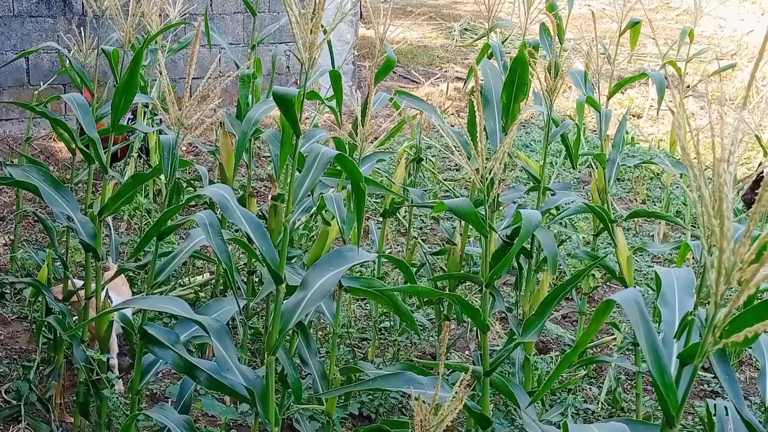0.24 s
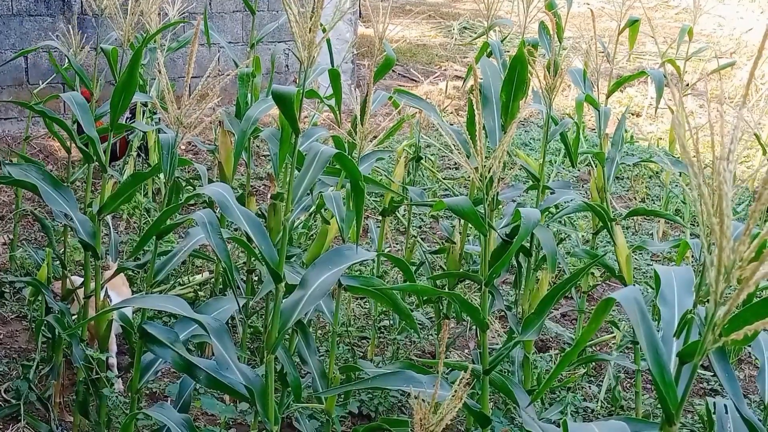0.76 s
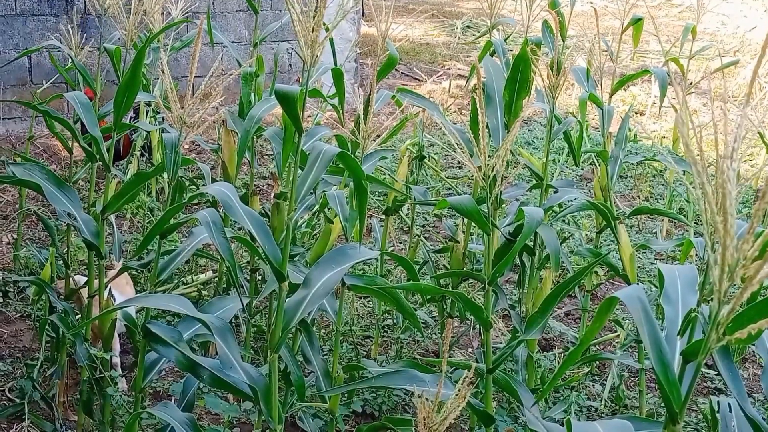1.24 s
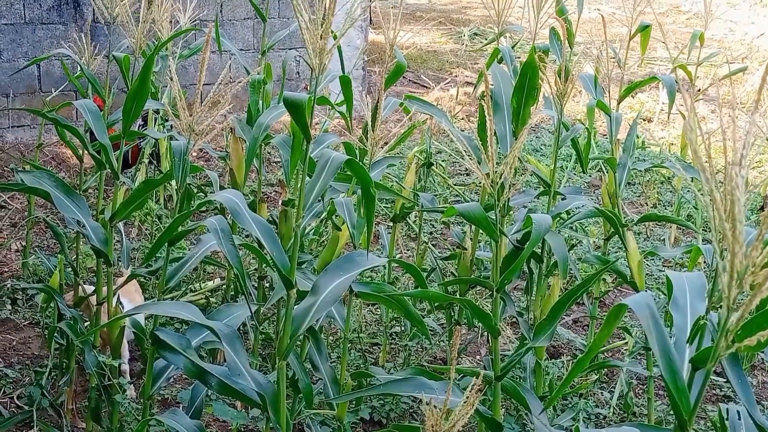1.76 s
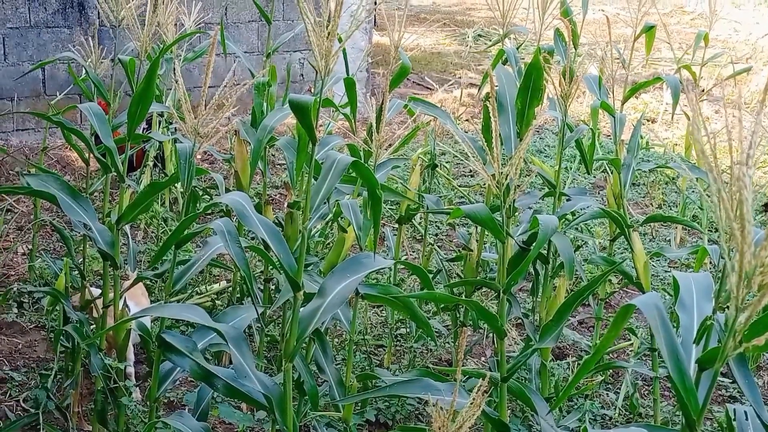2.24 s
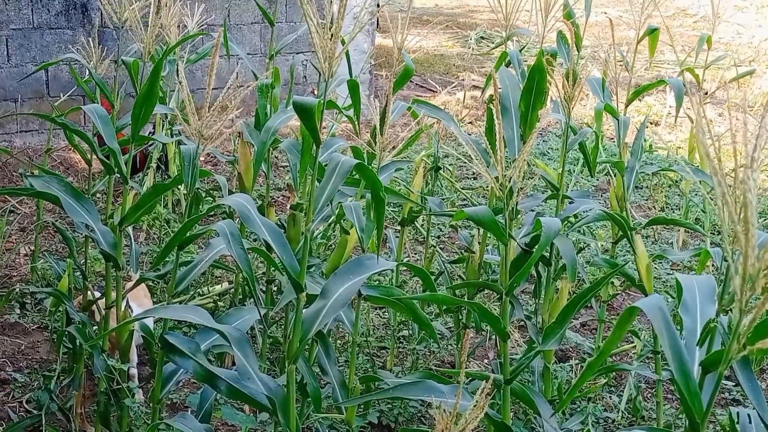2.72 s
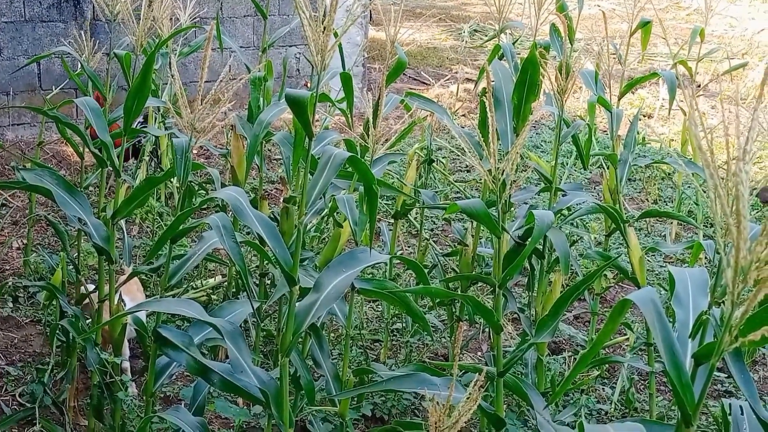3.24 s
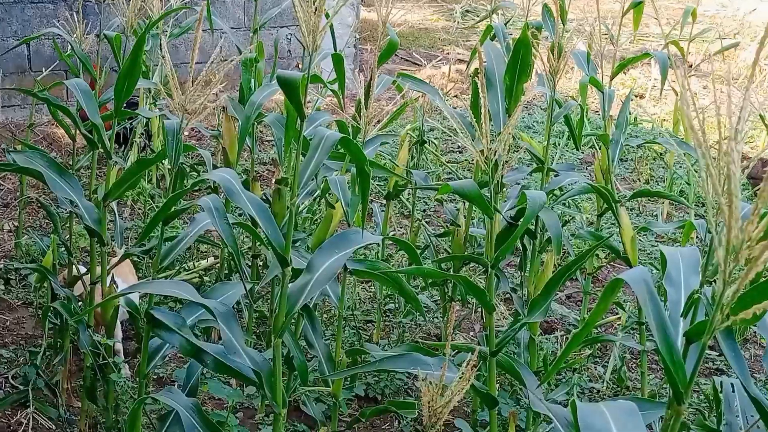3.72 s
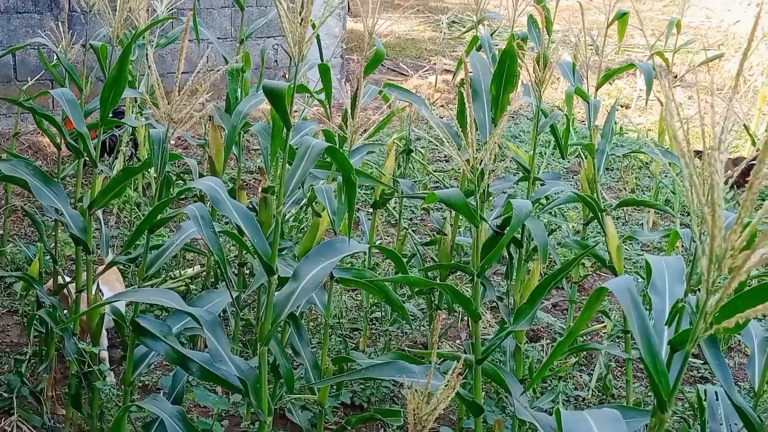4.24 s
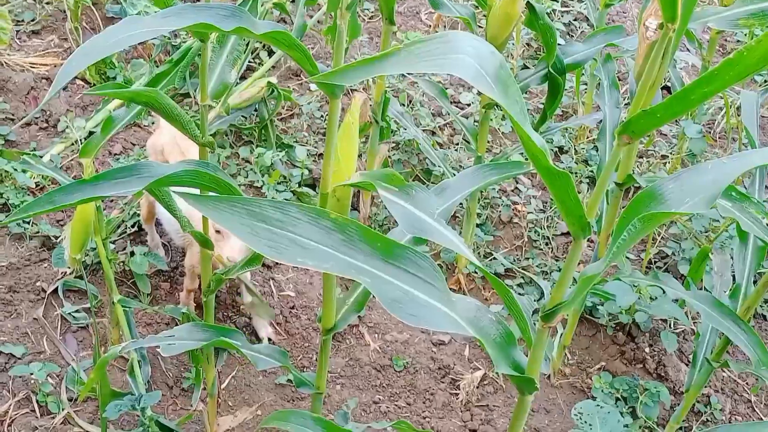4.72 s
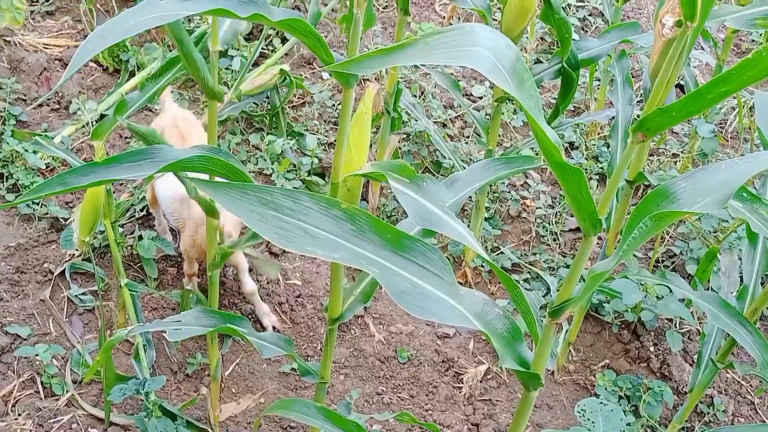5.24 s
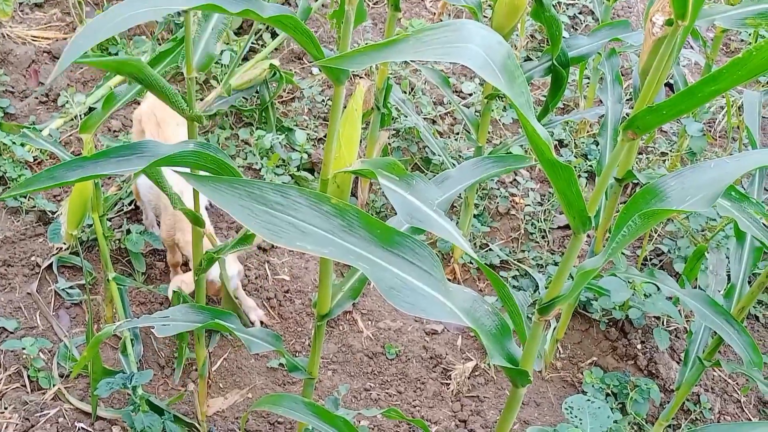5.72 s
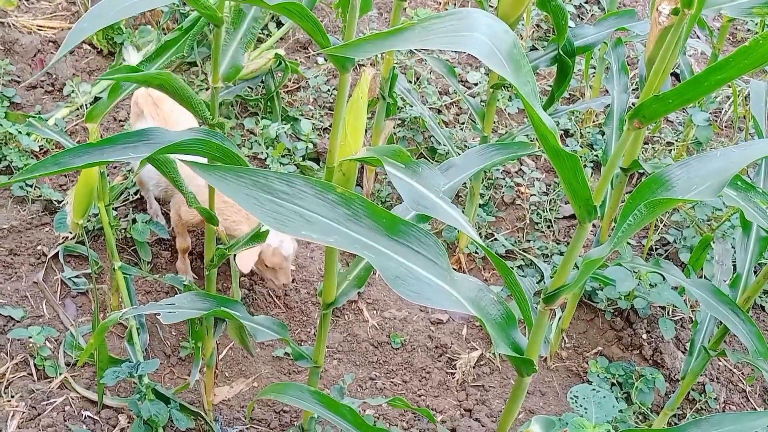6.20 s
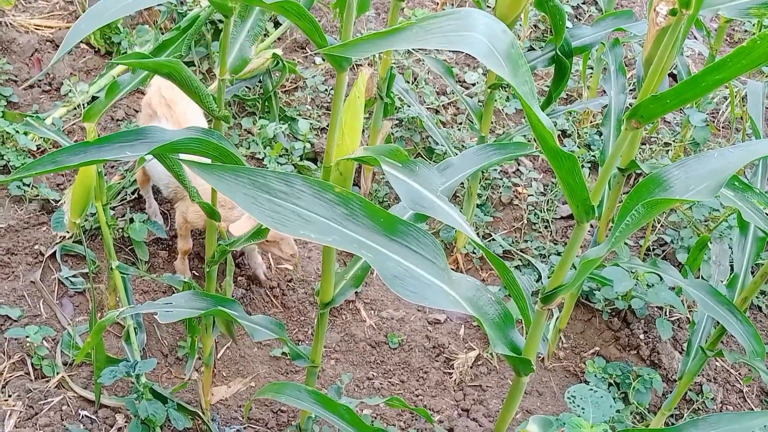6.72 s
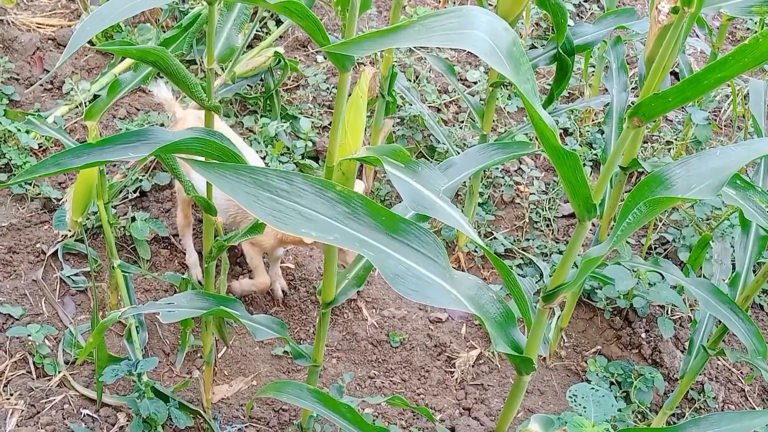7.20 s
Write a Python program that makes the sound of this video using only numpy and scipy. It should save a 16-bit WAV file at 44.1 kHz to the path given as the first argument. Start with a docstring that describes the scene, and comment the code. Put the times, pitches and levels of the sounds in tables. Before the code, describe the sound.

Small birds chirp throughout in an outdoor maize patch, over a faint bed of air and distant flock chatter. Far, echoing trills and a few falling chips open the first second, followed by short rising and slurred whistles. From about 1.9 to 3.9 seconds a close bird gives four high, falling peeps, roughly half a second apart, each followed by a quick dropping note. A very thin, faint twitter sits behind it between 2 and 3 seconds. Dull bumps and a low rumble reach the hand-held microphone from about 2 to 4.5 seconds. A brief, patchy hiss comes between 4 and 4.7 seconds, then distant trills and a short whistle fill the gap. The near bird returns softly at 5.8 seconds and peeps more strongly at about 6.3, 6.9 and 7.4 seconds, surrounded by diving whistles, trills and a quickening cluster of chips.

```python
"""A near bird repeats falling peeps, some followed by a quick tew, in a maize patch by a block wall.
Other small birds chip, dive, whistle and twitter all round; the farthest trill, smeared by echo.
Each voice is a syrinx: a nearly pure tone, bent in pitch and fluttering in level.
Dull bumps and a low rumble reach the hand-held microphone, and a brief, patchy treble hiss sits behind
the high calls, all over a faint bed of outdoor air and distant flock."""
import sys
import numpy as np
from scipy import signal
from scipy.fft import rfft, irfft
from scipy.io import wavfile
from scipy.ndimage import uniform_filter1d, minimum_filter1d, map_coordinates

SR = 44100
rng = np.random.default_rng(int(sys.argv[2]) if len(sys.argv) > 2 else 0)


def store_pcm(level_fs):
    """Save levels as 16-bit WAV."""
    pcm = np.round(np.clip(level_fs, -1, 1) * 32767).astype(np.int16)
    wavfile.write(sys.argv[1], SR, np.atleast_2d(pcm).T)


N = 328986
TIME = np.arange(N) / SR

# tone of the outdoor air: frequency_hz, density_db
AIR_COLOUR = [(25, -41), (70, -1.5), (150, 15.5), (300, -28), (700, 5.5), (4300, -5), (5500, -2),
              (8400, -12.5), (11600, -42), (15000, -35.5)]
# tone of the distant flock: frequency_hz, density_db
FLOCK_COLOUR = [(1000, -63), (1400, -6.5), (1800, 7), (3600, 10.5), (4200, 9.5), (4900, -34.5), (6000, -42)]
# fader ride on the flock: time_s, level_db
FLOCK_RIDE = [(0, -19.5), (.85, -26), (1.3, -34), (4.4, -30.5), (5.2, -23.5), (7.46, -36.5)]
# fader ride on the low buffeting: time_s, level_db
RUMBLE_RIDE = [(0, -39), (.7, -45), (1.55, -46.5), (1.8, -32.5), (2.7, -30.5), (3.1, -39), (4.4, -33.5),
               (4.7, -36.5)]
# tone of the buffeting and its small knocks: frequency_hz, density_db
RUMBLE_COLOUR = [(25, -47), (85, 2.5), (170, 0), (500, -11), (2000, -54.5)]
# the hardest bumps on the microphone: start_s, level_db
THUDS = [(1.952, -16), (2.072, -11.5), (2.106, -18.5), (2.538, -14), (2.625, -18), (3.561, -14.5),
         (3.644, -15), (3.937, -19), (4.008, -27), (4.225, -20), (4.376, -15.5), (4.423, -20)]
# far trills, plus the fuzzy ringing echo of one slurred whistle (at 1.338 s):
# start_s, length_s, first_pitch_hz, last_pitch_hz, fall_per_note_hz, level_db
TRILLS_AND_ECHO = [(0, 0.042, 1787, 1779, 432, -13.5), (.005, 0.043, 4450, 4790, 495, -22.5),
                   (.046, .22, 2906, 2762, 344, -12.5), (0.048, 0.41, 2304, 2274, 380, -11.5),
                   (1.338, 0.12, 3662, 3730, 250, -13), (2.717, 0.17, 2686, 2700, 420, -23),
                   (2.739, 0.24, 1964, 1933, 498, -22), (3.029, 0.2, 2120, 2040, 427, -22.5),
                   (3.104, .39, 1552, 1449, 57.3, -24), (4.514, 0.085, 4444, 3330, 460, -14.5),
                   (4.606, .18, 3500, 3010, 650, -10), (4.622, 0.15, 3960, 3860, 392, -18.5),
                   (4.791, 0.4, 3058, 2554, 774, -15.5), (4.793, 0.23, 1739, 1814, 275, -13),
                   (4.798, 0.2, 2294, 2130, 200, -16.5), (4.99, .08, 9500, 9330, 251, -34.5),
                   (5.167, .04, 1304, 1494, 300, -19), (5.206, .24, 1652, 1790, 307, -15.5),
                   (5.17, 0.39, 3090, 2834, 1620, -22), (5.421, 0.14, 3930, 3820, 263, -16),
                   (5.518, 0.2, 3670, 3776, 576, -22.5), (5.591, 0.13, 3276, 3204, 508, -8.5),
                   (5.708, 0.34, 2988, 2763, 882, -14.5), (5.715, 0.17, 2318, 2080, 356, -22),
                   (5.863, 0.45, 2186, 2308, 1016, -9.5), (6.339, 0.22, 2218, 2090, 313, -16),
                   (6.603, .27, 3223, 3514, 1553, -16), (6.656, 0.14, 2229, 2194, 947, -13.5),
                   (6.999, 0.098, 4215, 4170, 250, -16), (7.103, 0.307, 3404, 3520, 1110, -18.5)]
# low, distant warbles: start_s, length_s, first_pitch_hz, level_db
LOW_WARBLES = [(1.907, 0.24, 1705, -29), (2.122, 0.19, 1457, -24.5), (2.698, 0.44, 1172, -39),
               (3.066, 0.039, 616, -28.5)]
# a tiny bird's climbing trills: start_s, length_s, level_db
TINY_TRILLS = [(0.189, 0.39, -38.5), (2.739, 0.18, -37.5)]
# whistles held on one note: start_s, length_s, pitch_hz, level_db
HELD_WHISTLES = [(.01, .5, 1642, -27.5), (0.535, 0.11, 3407, -12), (0.705, 0.095, 5190, -29.5),
                 (1.768, 0.39, 2233, -29), (4.05, 0.071, 2686, -23), (4.125, 0.42, 2714, -34.5),
                 (4.16, 0.169, 1843, -33.5), (6.325, 0.053, 3100, -18)]
# whistles that bend up into a flick: start_s, length_s, first_pitch_hz, level_db
RISING_WHISTLES = [(1.046, 0.092, 3300, -13), (1.571, 0.1, 3193, -14.5), (1.686, .12, 1737, -29.5),
                   (2.119, 0.1, 3172, -9), (5.205, 0.078, 1656, -8), (6.786, 0.081, 4350, -33)]
# whistles that ease down on to a note: start_s, length_s, top_pitch_hz, low_pitch_hz, level_db
SLURRED_WHISTLES = [(0.961, 0.068, 2480, 2190, -14), (1.229, .12, 4230, 3668, -11.5),
                    (1.754, 0.13, 4060, 3533, -10), (2.218, 0.058, 2404, 2233, -9.5),
                    (2.326, 0.081, 3843, 3556, -10), (6.07, .24, 9700, 9440, -45.5)]
# whistles that plunge, then sag gently: start_s, length_s, dive_s, landing_pitch_hz, level_db
DIVING_WHISTLES = [(6.147, 0.094, 0.045, 4960, -20), (6.549, 0.08, .038, 3650, -11),
                   (7.315, .072, 0.035, 3990, -12.5)]
# thin zips falling from very high: start_s, length_s, level_db
HIGH_ZIPS = [(0.227, .08, -43), (3.819, 0.079, -42.5), (4.328, 0.063, -38.5), (4.837, 0.062, -44.5)]
# the neighbours' falling chips: start_s, first_pitch_hz, last_pitch_hz, level_db
FALLING_CHIPS = [(0.242, 4350, 3870, -16), (0.555, 5080, 4460, -16.5), (0.757, 4530, 3744, -16),
                 (6.067, 4170, 3180, -20), (6.234, 4640, 3710, -17.5), (6.759, 3640, 2784, -12.5),
                 (7.066, 3970, 2815, -15.5), (7.098, 4080, 2690, -16), (7.163, 4273, 3193, -8),
                 (7.213, 3966, 2743, -14.5), (7.247, 3880, 2677, -14)]
# the near bird's long peeps: top_of_note_s, level_db
NEAR_PEEPS = [(1.888, -12), (2.407, -8.5), (2.956, -8), (3.526, -8), (5.795, -18.5), (6.344, -8),
              (6.886, -9.5), (7.438, -13)]
# its quick tews: top_of_note_s, level_db
NEAR_TEWS = [(2.151, -9), (2.678, -15), (3.241, -13), (3.807, -13)]
# tone of the brief treble hiss: frequency_hz, density_db
HISS_COLOUR = [(3000, -8.5), (6500, 4), (8500, -7.5), (12000, -40)]
# fader ride on the hiss: time_s, level_db
HISS_RIDE = [(3.97, -59), (4.02, -35), (4.42, -39), (4.56, -25), (4.65, -56), (5, -79)]
# the microphone's EQ, uneven in the treble: frequency_hz, gain_db
MICROPHONE_EQ = [(65, 5), (4300, 2), (5500, -10), (6700, -9.5), (8400, 7.5), (9500, -1), (10700, -6),
                 (11500, 15.5), (14500, -4.5)]


def amp(db):
    """Decibels to gain."""
    return 10 ** (np.asarray(db) / 20)


def unit(x):
    """Scales to an rms of one."""
    return x / np.sqrt(np.mean(x ** 2) + 1e-20)


def add(mix, s, sound):
    """Drops a sound into the mix at s seconds."""
    part = mix[max(round(s * SR), 0):][:len(sound)]
    part += sound[:len(part)]


def wander(size, per_s):
    """Smooth random modulation of about unit size, through per_s points a second."""
    knots = rng.standard_normal(4096)
    return map_coordinates(knots, [np.arange(size) * per_s / SR], order=3, mode="wrap")


def noise(colour):
    """Noise shaped by a colour table."""
    hz, db = np.transpose(colour)
    gain = amp(np.interp(np.log(np.fft.rfftfreq(N, 1 / SR) + 1), np.log(hz), db))
    return unit(irfft(rfft(rng.standard_normal(N)) * gain, N))


def ride(points):
    """Gain that follows a fader ride through the scene."""
    return amp(np.interp(TIME, *np.transpose(points)))


def fade(t, length, rise, fall):
    """A note's envelope: smooth attack, hold, smooth release."""
    attack = np.sin(np.pi / 2 * np.clip(t / rise, 0, 1)) ** 2
    release = np.sin(np.pi / 2 * np.clip((length - t) / fall, 0, 1)) ** 2
    return attack * release


def low_cut(x, edge_hz):
    """Rolls off what lies below the edge."""
    return signal.sosfiltfilt(signal.butter(2, edge_hz, "highpass", fs=SR, output="sos"), x)


def background(air_db=-42):
    """The bed: gently wavering outdoor air and the blurred chatter of a distant flock."""
    air = amp(air_db + 1.5 * wander(N, 14)) * noise(AIR_COLOUR)
    flock = ride(FLOCK_RIDE) * amp(2 * wander(N, 24)) * noise(FLOCK_COLOUR)
    return air + flock


def bumps(knocks_per_s=15, centre_hz=165, attack_s=.0018):
    """Dull thuds on the microphone over a lumpy rumble; small random knocks follow the rumble's ride."""
    t = np.arange(SR // 5) / SR
    level = ride(RUMBLE_RIDE)
    hits = amp(-3) * level * rng.uniform(0, 3, N) * (rng.random(N) < knocks_per_s / SR)
    knock_shape = np.exp(-t / .02) * np.minimum(t / .003, 1)
    knocks = signal.fftconvolve(hits, knock_shape)[:N]
    thuds = np.zeros(N)
    thud_shape = t / attack_s * np.exp(1 - t / attack_s)
    for s, db in THUDS:
        hz = centre_hz * amp(2 * rng.uniform(-1.3, 1))
        add(thuds, s, amp(db) * thud_shape * np.sin(2 * np.pi * hz * t))
    rumble = level * amp(-9.5 + 3 * wander(N, 30))
    return low_cut(thuds, edge_hz=85) + (knocks + rumble) * noise(RUMBLE_COLOUR)


def syrinx(hz, waver=.00062, flutter_db=7.5):
    """A bird's voice: a nearly pure tone with faint overtones, wavering in pitch and level."""
    phase = 2 * np.pi * np.cumsum(hz * (1 + waver * wander(len(hz), 180))) / SR
    overtones = amp(-53) * np.sin(2 * phase) + amp(-41) * np.sin(3 * phase) * (3 * hz < SR / 2)
    return np.sqrt(2) * (np.sin(phase) + overtones) * amp(flutter_db * wander(len(hz), 88.36))


def trill(hz, slur_hz, db, notes_per_s=42):
    """A quick, slightly uneven run of down-slurred notes around a pitch curve."""
    t = np.arange(len(hz)) / SR
    note_phase = np.cumsum(notes_per_s * (1 + .13 * wander(len(t), 30))) / SR % 1
    voice = syrinx(hz + slur_hz * (.5 - note_phase), waver=.0212, flutter_db=4)
    accents = amp(2 * wander(len(t), notes_per_s))
    notes = fade(note_phase, 1, rise=.11, fall=.16) * voice * accents
    return amp(db) * unit(notes) * fade(t, len(hz) / SR, rise=.0031, fall=.0047)


def trills_and_echo(warble_sink_per_s=.28):
    """The far layer: gliding trills, one whistle's fuzzy echo, sinking warbles, tiny climbing trills."""
    out = np.zeros(N)
    for s, length, first_hz, last_hz, slur_hz, db in TRILLS_AND_ECHO:
        add(out, s, trill(np.geomspace(first_hz, last_hz, round(length * SR)), slur_hz, db))
    for s, length, hz, db in LOW_WARBLES:
        t = np.arange(0, length, 1 / SR)
        add(out, s, trill(hz * (1 - warble_sink_per_s * t), slur_hz=.15 * hz, db=db))
    for s, length, db in TINY_TRILLS:
        add(out, s, trill(np.linspace(8500, 9820, round(length * SR)), slur_hz=352, db=db))
    return out


def whistle(hz, db, waver_hz=55):
    """One unsteady whistled note along a pitch curve; the low ones are the hoarser."""
    t = np.arange(len(hz)) / SR
    envelope = amp(db + 2 * wander(len(t), 11.7)) * fade(t, len(hz) / SR, rise=.0081, fall=.0029)
    return envelope * syrinx(hz, waver=waver_hz / hz.mean(), flutter_db=2.5)


def slide(t, top, low, fall_s):
    """A bend that drops from the top, bottoms out at fall_s and lifts a little."""
    return low + (top - low) * np.maximum(1 - t / fall_s, -1 / np.pi) ** 2


def whistles(dive_top_hz=7670, sag_hz_per_s=1700):
    """The middle layer: held, rising, slurred and diving notes; slurs and dives swell as they land."""
    out = np.zeros(N)
    for s, length, hz, db in HELD_WHISTLES:
        add(out, s, whistle(np.full(round(length * SR), float(hz)), db, waver_hz=27.3))
    for s, length, hz, db in RISING_WHISTLES:
        progress = np.arange(0, length, 1 / SR) / length
        bend, end_flick = .14 * progress ** 2, .2 * progress ** 20
        add(out, s, whistle(hz * (1 + bend + end_flick), db))
    for s, length, top_hz, low_hz, db in SLURRED_WHISTLES:
        height = slide(np.arange(0, length, 1 / SR), top=.96, low=0, fall_s=.71 * length)
        add(out, s, whistle(low_hz + (top_hz - low_hz) * height, db - 12 * height))
    for s, length, dive_s, hz, db in DIVING_WHISTLES:
        t = np.arange(0, length, 1 / SR)
        height = np.maximum(1 - t / dive_s, 0) ** 2
        add(out, s, whistle(hz + (dive_top_hz - hz) * height - sag_hz_per_s * t, db - 17 * height))
    return out


def zips(top_hz=9040, low_hz=4790, swell_db=9.5):
    """Thin calls that sweep down from very high, swelling as they fall."""
    out = np.zeros(N)
    for s, length, db in HIGH_ZIPS:
        t = np.arange(0, length, 1 / SR)
        envelope = amp(db + swell_db * t / length) * fade(t, length, rise=.0055, fall=.0046)
        add(out, s, envelope * syrinx(np.linspace(top_hz, low_hz, len(t)), waver=.02, flutter_db=-4.5))
    return out


def chips(length_s=.029, decay_db_per_s=83):
    """The neighbours' clipped notes: the pitch drops fast, then eases off."""
    out = np.zeros(N)
    t = np.arange(0, length_s, 1 / SR)
    for s, first_hz, last_hz, db in FALLING_CHIPS:
        hz = last_hz + (first_hz - last_hz) * np.abs(1 - t / length_s) ** 1.7
        envelope = amp(db - decay_db_per_s * t) * fade(t, length_s, rise=.0074, fall=length_s / 10)
        add(out, s, envelope * syrinx(hz, waver=.013, flutter_db=-.5))
    return out


def flicks(lead_s=.031, length_s=.014):
    """The faint upward pickup just ahead of each of the near bird's notes."""
    out = np.zeros(N)
    t = np.arange(0, length_s, 1 / SR)
    hz = np.linspace(4000, 6100, len(t))
    for s, db in NEAR_PEEPS + NEAR_TEWS:
        add(out, s - lead_s, amp(db - 19) * np.sin(np.pi * t / length_s) * syrinx(hz))
    return out


def scoop(t, top_hz, lead_s):
    """The near bird's leap in pitch, reaching the top at t = 0."""
    return top_hz * (1 - .2665 * (t / lead_s) ** 2)


def peeps(top_hz=4554, low_hz=3542, lead_s=.01, body_s=.21):
    """The near bird scoops up to its top pitch, then slides down, swelling into a long release."""
    out = np.zeros(N)
    t = np.arange(-lead_s, body_s, 1 / SR)
    hz = np.where(t < 0, scoop(t, top_hz, lead_s), slide(t, top_hz, low_hz, fall_s=.135))
    swell = amp(-6 * np.exp(-np.maximum(t, 0) / .017))
    envelope = swell * fade(t + lead_s, body_s + lead_s, rise=lead_s, fall=.13)
    for s, db in NEAR_PEEPS:
        add(out, s - lead_s, amp(db) * envelope * syrinx(hz, waver=.0028, flutter_db=-1.5))
    return out


def twitter(start_s=1.98, length_s=1.0, pitch_hz=8750, notes_per_s=8.23, db=-38):
    """A tiny bird's thin, very high notes that dip and rise."""
    out = np.zeros(N)
    t = np.arange(0, length_s, 1 / SR)
    hz = pitch_hz + 420 * wander(len(t), 20)
    pulses = fade(t * notes_per_s % 1, .76, rise=.75, fall=.29)
    add(out, start_s, amp(db) * pulses * syrinx(hz))
    return out


def tews(top_hz=4380, low_hz=2620, lead_s=.01, body_s=.06, fall_s=.022, decay_db_per_s=185):
    """The near bird's follow-up note scoops up, drops fast and dies away."""
    out = np.zeros(N)
    t = np.arange(-lead_s, body_s, 1 / SR)
    hz = np.where(t < 0, scoop(t, top_hz, lead_s), low_hz + (top_hz - low_hz) * np.exp(-t / fall_s))
    envelope = amp(-decay_db_per_s * t) * fade(t + lead_s, body_s + lead_s, rise=lead_s / 2, fall=.015)
    for s, db in NEAR_TEWS:
        add(out, s - lead_s, amp(db) * envelope * syrinx(hz, waver=.017, flutter_db=2))
    return out


def hiss(patchy_db=4):
    """A brief hiss behind the high calls, each patch of the treble flickering on its own."""
    spectrum = signal.stft(noise(HISS_COLOUR))[2]
    patches = unit(signal.fftconvolve(rng.standard_normal(spectrum.shape), np.ones((5, 8)), "same"))
    flickering = signal.istft(spectrum * amp(patchy_db * patches))[1][:N]
    return ride(HISS_RIDE) * unit(flickering)


def hoarse(x, depth):
    """Fast flutter spreads each pure tone into a fuzzy band."""
    return x * (1 + depth * wander(len(x), 1100))


def yard(x, t60_s, delay_s, echoes_per_s=3000):
    """Dense echoes off walls and plants; the high treble dies twice as fast."""
    t = np.arange(SR) / SR
    taps = rng.choice([-1., 1.], SR) * (rng.random(SR) < echoes_per_s / SR)
    decay = amp(-60 * t / t60_s)
    treble = low_cut(taps, edge_hz=9100)
    tail = ((taps - treble) * decay + treble * decay ** 2) * (t > delay_s)
    return signal.fftconvolve(x, tail / np.linalg.norm(tail))[:N]


def scene():
    """The mono mix: the farther the bird, the wetter and more blurred it sits."""
    chipping = chips() + zips()  # placed between near and far by feeding both layers
    near = peeps() + tews() + flicks() + amp(-5) * chipping
    middle = whistles()
    far = trills_and_echo() + amp(-2.5) * chipping
    birds = near + amp(-13.5) * yard(near, t60_s=.058, delay_s=.003)
    birds += amp(-7) * yard(hoarse(near, depth=.049), t60_s=1, delay_s=.0092)
    birds += amp(-1.5) * middle + amp(-6.5) * yard(middle, t60_s=.3, delay_s=.0031)
    bright_send = low_cut(hoarse(middle, depth=.036), edge_hz=2770)
    birds += amp(-.5) * yard(bright_send, t60_s=1, delay_s=.014)
    birds += amp(-6.5) * far + amp(-2.5) * yard(far, t60_s=.16, delay_s=.001)
    birds += amp(-4.5) * yard(far, t60_s=1, delay_s=.014)
    tiny = twitter()
    birds += tiny + amp(-7.5) * yard(tiny, t60_s=.36, delay_s=.011)
    return (birds + bumps() + hiss() + background())[None]


def record(dry, knee_db=-15, squeeze=.55, release_db_per_s=70, makeup_db=1, ceiling=.88, edge_hz=15800):
    """Microphone EQ, gain control that leans on loud calls, a peak limiter, then a steep high cut."""
    hz, db = np.transpose(MICROPHONE_EQ)
    heard = irfft(rfft(dry[0]) * amp(np.interp(np.fft.rfftfreq(N, 1 / SR), hz, db)), N)
    power_db = 10 * np.log10(abs(uniform_filter1d(heard ** 2, size=300)) + 1e-12)
    release_db = TIME * release_db_per_s
    held_db = np.maximum.accumulate(power_db + release_db) - release_db  # jumps up, sinks slowly
    over_db = np.maximum(held_db - knee_db, 0)
    heard *= amp(makeup_db - squeeze * uniform_filter1d(over_db, size=200))
    limiter_gain = np.minimum(ceiling / (abs(heard) + 1e-9), 1)
    heard *= uniform_filter1d(minimum_filter1d(limiter_gain, size=301), size=301)
    high_cut = signal.firwin(511, edge_hz, window=("kaiser", 9), fs=SR)
    return signal.oaconvolve(heard, high_cut, "same")[None]


dry = scene()
out = record(dry)
store_pcm(out)
```